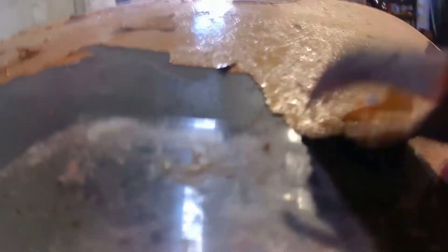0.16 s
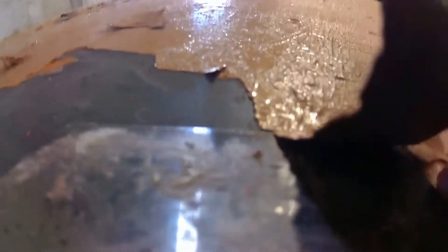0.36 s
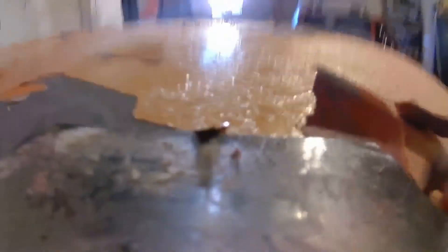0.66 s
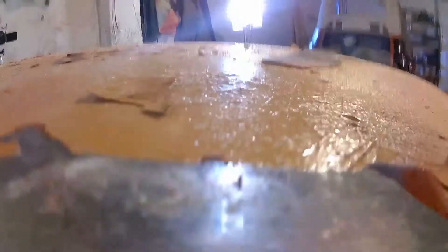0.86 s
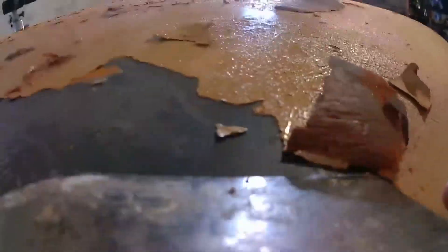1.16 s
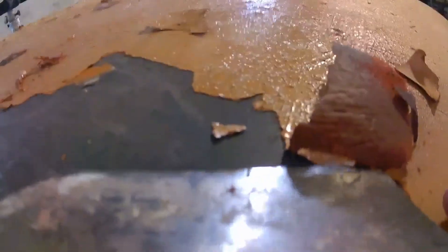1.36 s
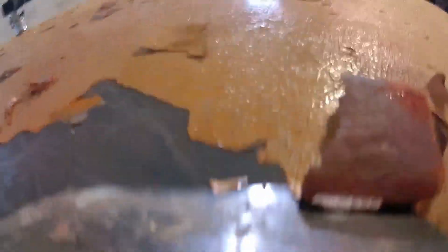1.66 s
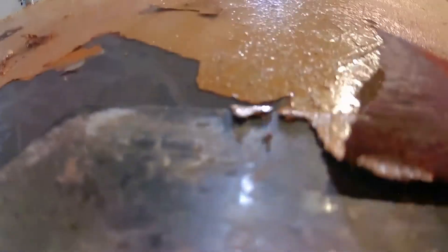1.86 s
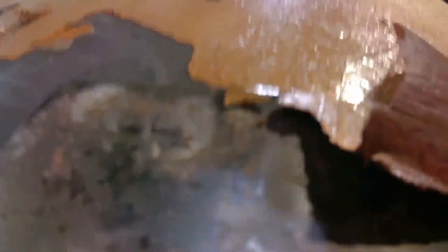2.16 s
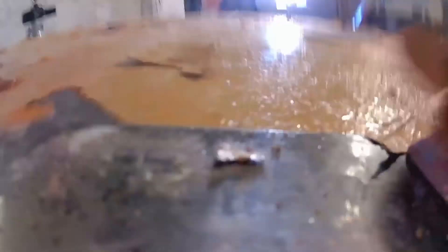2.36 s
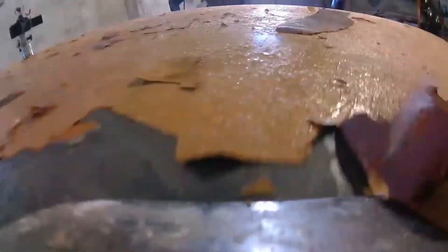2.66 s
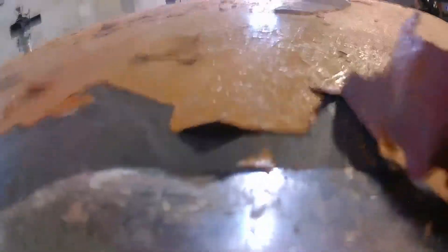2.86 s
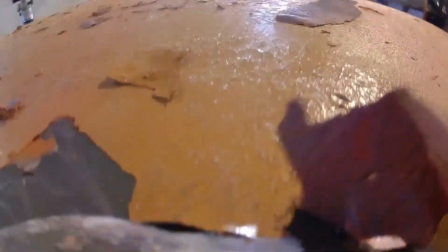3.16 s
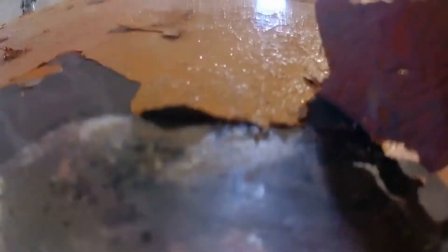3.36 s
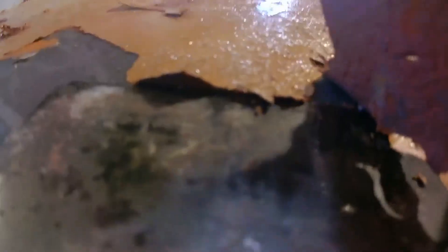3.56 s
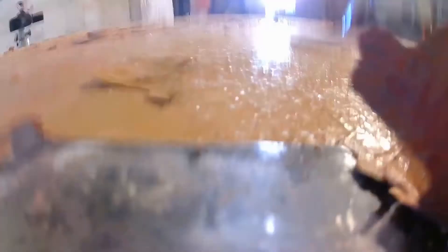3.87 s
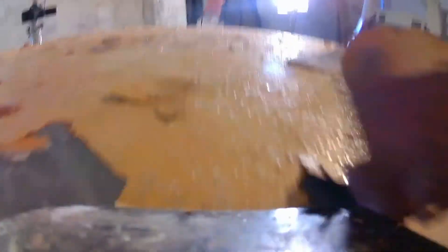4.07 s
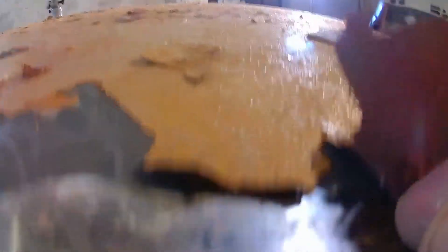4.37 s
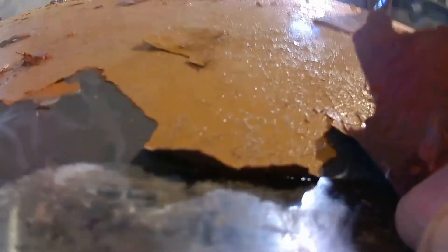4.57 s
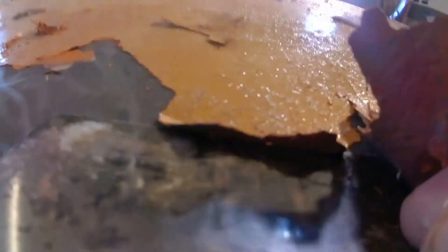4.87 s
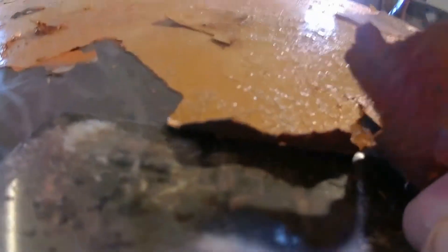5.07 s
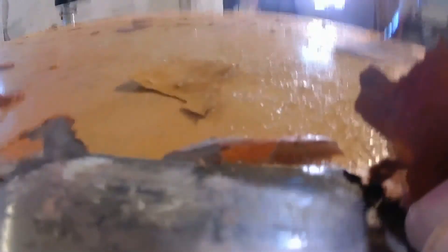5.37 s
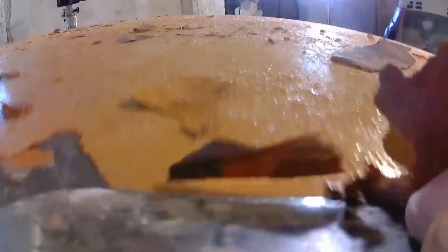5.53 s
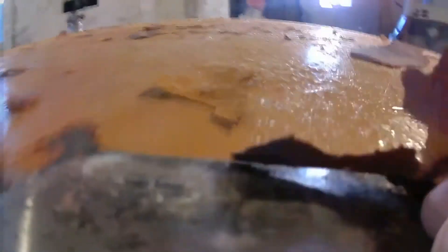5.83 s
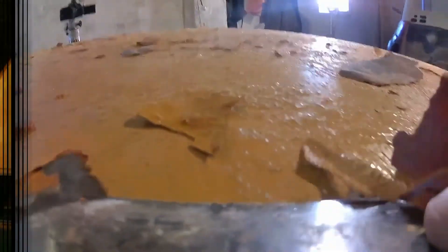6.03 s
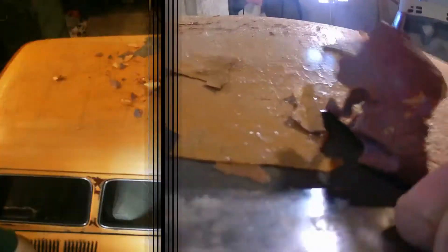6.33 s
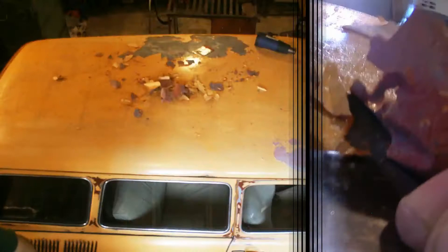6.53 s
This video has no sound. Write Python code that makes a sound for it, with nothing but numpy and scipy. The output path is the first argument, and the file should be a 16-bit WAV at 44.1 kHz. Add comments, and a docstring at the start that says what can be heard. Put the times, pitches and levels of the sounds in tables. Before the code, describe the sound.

Very close, dry scraping of a wide steel blade under flaking paint on a car roof, picked up through the metal without room echo. From the start, short rough shoves rasp and crackle, strong around 0.2 and 0.7 to 1.0 seconds, with a low groan and a skidding squeal. Lighter strokes with snapping chips follow until 2.0. At about 2.35 the edge catches with a hard crack and a deep thump, then more scraping and groaning; a heavy hollow knock lands at 3.14. After a short dip, a strong rasp comes at 3.8, and more strokes until 4.4. From 4.5 to 5.2 it is nearly quiet, with faint rubbing and small ticks. A loud cracking jolt breaks in at 5.35, another at 5.6, then broad rasps around 5.9, a sharp snap at 6.27, and short scrapes and a clack until about 6.7. Peaks distort; a faint dull noise floor lies beneath.

```python
"""Dry, close rasping in short strokes: a wide steel scraper is shoved under the flaking paint of a car roof.
Random tiny fractures of grit and paint ring through filters for the steel; others make the roof panel boom.
Decaying tones thump as the edge catches, bursts of cracks are snapping chips, and gliding tones groan and screech.
The sound reaches a small recorder on the scraper through the metal, with no room echo, and overloads it.
"""
import sys
import numpy as np
from scipy import signal
from scipy.fft import rfft, irfft, next_fast_len
from scipy.io import wavfile
from scipy.ndimage import uniform_filter1d, map_coordinates

SR = 44100
rng = np.random.default_rng(int(sys.argv[2]) if len(sys.argv) > 2 else 0)


def store_wav(level_fs):
    """Save 16-bit WAV to argv[1]."""
    pcm = np.round(np.clip(np.atleast_2d(level_fs), -1, 1) * 32767)
    wavfile.write(sys.argv[1], SR, pcm.T.astype(np.int16))


N = 295463
TIME = np.arange(N) / SR  # seconds

# colour of blade and mount: f/Hz, gain/dB
BLADE_COLOUR = [(300, 0), (800, -0.5), (1150, 2.5), (1440, 9), (1600, -4), (1720, -9), (1920, 0.5),
                (2250, -3), (2700, 0.5), (3050, 0.5), (3350, -6.5), (3700, -1), (4050, 1), (4450, 2.5),
                (4750, -4.5), (5400, -5.5), (6000, -9), (6350, -5), (7000, -30)]
# resonances of the roof panel under the blade: f/Hz, width/Hz, gain/dB
ROOF_MODES = [(77, 59, 1), (143, 100, 5), (190, 45, -17.5), (283, 91, -6), (412, 147, 1), (715, 320, -9.5)]
# shoves of the scraper: t of full force/s, rise/s, hold/s, fall/s, rasp drive/dB,
# then edge noise, fine tearing, blade ring and hollow rattle (each dB over the rasp drive),
# roof boom drive/dB, lower and upper f/Hz at which the edge bears on a node
SHOVES = [(0.061, 0.17, 0.018, 0.034, -41, -2.5, -25, -7, -4.5, -40.5, 2540, 3360),
          (0.155, 0.071, 0.087, 0.11, -29.5, -5.5, -23, -6, -3, -27.5, 2430, 5000),
          (0.431, 0.15, 0.008, 0.19, -45.5, 0, -16, -4, -7, -41, 1720, 4700),
          (0.502, 0.069, 0.033, 0.18, -42.5, -8.5, -17, -6, -4, -37, 1720, 4950),
          (0.665, 0.1, 0.052, 0.069, -27, -2.5, -13.5, -16, -3.5, -26.5, 1046, 3270),
          (0.84, 0.1, 0.051, 0.098, -27, -0.5, -15, -27, -3, -30, 1140, 3130),
          (1.001, 0.061, 0.07, 0.058, -25.5, -1, -7.5, -33, -4.5, -43, 2810, 3080),
          (1.12, 0.11, 0.027, 0.044, -36, -1, -11, -17, 2, -37, 2630, 4570),
          (1.16, 0.012, 0.012, 0.028, -30.5, 2.5, -14, -21, 3.5, -28.5, 2160, 5060),
          (1.241, 0.22, 0.039, 0.048, -35, -1, -16.5, -15, -2, -35.5, 2570, 5040),
          (1.433, 0.078, 0.059, 0.024, -48.5, -1.5, -17, -1, -2.5, -48, 930, 5170),
          (1.496, 0.042, 0.045, 0.082, -32, 0, -13, -4, -5.5, -32.5, 970, 5400),
          (1.687, 0.057, 0.042, 0.046, -57.5, -1, -18, -20, 1, -50, 2630, 3320),
          (1.767, 0.076, 0.029, 0.076, -30.5, -2, -33, -4, -2.5, -28, 2350, 5330),
          (1.956, 0.17, 0.037, 0.091, -40, -3, -20, -5, -5.5, -34.5, 2400, 3380),
          (2.168, 0.009, 0.48, 0.094, -57, 3.5, -4.5, -9, -9, -47.5, 2520, 4650),
          (2.378, 0.064, 0.046, 0.11, -26.5, -6, -15, -27, -3.5, -29, 2490, 4800),
          (2.63, 0.1, 0.074, 0.4, -34.5, 0, -10, -28, 1, -38, 1480, 2900),
          (2.676, 0.0085, 0.0056, 0.01, -31.5, 7, -20, -24, -6, -33, 1850, 2890),
          (2.771, 0.13, 0.018, 0.072, -34, 0.5, -5, -18, -8, -26.5, 2820, 4750),
          (2.891, 0.12, 0.067, 0.11, -35, -4.5, -14, -5, -5, -34, 1740, 5060),
          (2.957, 0.057, 0.059, 0.045, -28.5, 1.5, -14, -11, 0.5, -24, 1690, 5030),
          (3.134, 0.054, 0.06, 0.051, -38.5, -7.5, -11.5, -13, -2.5, -31, 2220, 2950),
          (3.353, 0.027, 0.0024, 0.12, -38.5, -7, -4.5, -8, 0, -33.5, 1840, 5190),
          (3.563, 0.063, 0.003, 0.045, -52.5, 1, -13, -1, -4, -50, 2370, 4430),
          (3.708, 0.081, 0.036, 0.06, -50.5, 2.5, -18, -3, -5, -44, 2240, 4740),
          (3.834, 0.062, 0.071, 0.043, -24.5, -2.5, -11.5, -19, -5.5, -25, 1245, 3640),
          (3.98, 0.13, 0.01, 0.1, -41, 4.5, -5, 1.5, -1, -60, 1730, 3320),
          (4.089, 0.086, 0.0062, 0.042, -30, 2, -7, -16, -1, -40, 1680, 3940),
          (4.122, 0.033, 0.029, 0.091, -30.5, -3.5, -13, -29, -4.5, -46, 1270, 4500),
          (4.233, 0.11, 0.0045, 0.036, -34.5, -0.5, -11, -24.5, 0.5, -32.5, 1950, 3050),
          (4.394, 0.14, 0.021, 0.047, -28.5, -0.5, -14.5, -20, -2, -32, 1200, 5200),
          (4.749, 0.2, 0.013, 0.19, -54.5, 4.5, -10.5, -1, -4, -51.5, 2540, 3400),
          (4.939, 0.13, 0.013, 0.05, -54.5, -3, -15, -21, -0.5, -51, 1660, 2870),
          (5.012, 0.077, 0.024, 0.35, -59.5, 1.5, -12, -19, -0.5, -64, 1750, 4800),
          (5.267, 0.052, 0.003, 0.15, -47, -4.5, -36, -10, -1.5, -33.5, 2240, 5050),
          (5.353, 0.022, 0.057, 0.064, -22, -4, -13.5, -12, -4, -24.5, 2260, 4870),
          (5.625, 0.12, 0.082, 0.095, -32, -5.5, -11, -15, -6, -36, 860, 4260),
          (5.847, 0.12, 0.043, 0.072, -26.5, 1.5, -18, -14, -3, -29, 1590, 3070),
          (5.905, 0.036, 0.066, 0.1, -27, -6, -18, -29, -5, -29.5, 2580, 5230),
          (6.073, 0.037, 0.1, 0.22, -35.5, -2.5, -11.5, -29, -2, -42, 2550, 3100),
          (6.26, 0.004, 0.076, 0.19, -31, -7.5, -10, -3.5, -5, -41, 2050, 3140),
          (6.421, 0.048, 0.05, 0.025, -29, 1, -14, -20, -0.5, -26, 2270, 3240),
          (6.597, 0.015, 0.0048, 0.025, -41, -11, -22, 10, 4, -30, 1010, 4890),
          (6.699, 0.007, 0.01, 0.03, -28, 8.5, -3, -11, 2, -31, 1140, 5400)]
# paint chips snap and the steel edge clacks down: t/s, drive/dB, roof knock over the crack drive/dB
CHIPS = [(0.118, -18.5, -26), (0.276, -17.5, -21), (0.5064, -46, -10), (0.542, -23.5, -23),
         (0.611, -28, -15), (1.159, -12, 7), (1.526, -6.5, -13), (1.548, -11.5, -18), (1.7615, -15, -9),
         (1.919, -26.5, 1), (1.978, -15.5, -7), (2.176, -30, -36), (2.345, -17, 6), (2.355, 4.5, 2.5),
         (2.483, -16.5, -11), (2.75, -11.5, -13), (2.772, 4.5, -27), (2.8843, -31, -14), (3.134, -20, -30),
         (3.143, -9, 16.5), (3.17, -27, 10), (3.338, -17.5, -26), (3.36, -23, 13), (3.6991, -21.5, -15),
         (3.7383, -8, -32), (3.7895, -11.5, -30), (3.809, -15, -21), (3.978, -22.5, -23), (3.987, -22, -14),
         (3.9988, -11.5, -32), (4.2263, -23.5, 15), (4.3153, -13, -10), (4.77, -48, -20),
         (4.933, -34.5, -11), (5.241, -31, -24), (5.26, -24, -19), (5.3508, 10, -4.5), (5.563, -20, -28),
         (5.577, -33, -17), (5.602, -0.5, 0.5), (5.664, -26, 2), (5.693, -24, 10), (5.809, -22.5, 8.5),
         (6.0812, -13, 2), (6.099, -10, -17), (6.188, -17, -1), (6.2503, -7.5, -27), (6.2653, 11, -15),
         (6.2807, -1.5, -13), (6.5922, -13.5, -1), (6.6975, 2, 2)]


def from_db(db):
    """Turn decibels into a gain."""
    return 10 ** (np.asarray(db) / 20)


def rms_one(x):
    """Scale to an rms level of one."""
    return x / np.sqrt(np.mean(x ** 2) + 1e-20)


def band(x, edges_hz, kind="band", order=3):
    """Keep one range of frequencies with a Butterworth filter."""
    sections = signal.butter(order, edges_hz, kind, fs=SR, output="sos")
    return signal.sosfilt(sections, x + 1e-18)


def drift(rate_hz):
    """Smooth random wandering with a spread of one: noise without its fast part."""
    noise = rng.standard_normal(N + SR)
    # the first second is dropped so that the filter has settled
    return rms_one(band(noise, rate_hz, "low", order=2)[SR:])


def two_poles(hz, r):
    """Feedback of a resonance: the nearer r is to one, the longer it rings."""
    return [1, -2 * r * np.cos(2 * np.pi * hz / SR), r * r]


def resonate(x, modes):
    """Let a sound excite several resonances side by side, each with its own gain."""
    out = np.zeros(N)
    for hz, width_hz, db in modes:
        r = np.exp(-np.pi * width_hz / SR)
        ring = signal.lfilter([1, 0, -1], two_poles(hz, r), x + 1e-18)
        out += from_db(db) * (1 - r * r) / 2 * ring
    return out


def steady(x, window_s):
    """Even out the slow level and keep the fast grain."""
    power = uniform_filter1d(x * x, int(window_s * SR))
    return x / np.sqrt(power + 1e-12)


def register(x, edges_hz, window_s):
    """One range of a sound at a steady level, filtered both ways so that it is not delayed."""
    sections = signal.butter(3, edges_hz, "band", fs=SR, output="sos")
    return steady(signal.sosfiltfilt(sections, x), window_s)


def coloured(x, spectrum):
    """Give a sound a colour listed as f/Hz, gain/dB, joined smoothly over pitch."""
    hz, db = np.transpose(spectrum)
    size = next_fast_len(N + SR // 10)
    log_hz = np.log(np.fft.rfftfreq(size, 1 / SR) + 1)
    gain = from_db(np.interp(log_hz, np.log(hz), db))
    return irfft(rfft(x, size) * gain, size)[:N]


def burst(s, db, t60):
    """An envelope that leaps up at s and dies away by 60 dB in t60 seconds: (slice, gain)."""
    at = int(s * SR)
    t = TIME[:min(SR // 5, N - at)]
    return slice(at, at + len(t)), from_db(db - 60 * t / max(t60, 0.003))


def swell(start, end):
    """A rounded arch from start to end."""
    arch = 4 * (TIME - start) * (end - TIME) / (end - start) ** 2
    return np.sqrt(np.clip(arch, 0, 1))


def grit(per_s, spread_db):
    """Tiny fractures are single clicks at random moments, a few much larger than the rest."""
    sizes = from_db(spread_db * np.minimum(rng.exponential(1, N), 5)) * rng.choice([-1, 1], N)
    return rms_one(sizes * (rng.random(N) < per_s / SR))


def background():
    """A faint, dull noise floor."""
    # colour of the noise floor: f/Hz, relative level/dB per Hz
    floor_colour = [(18, -33), (30, 6), (96, 29), (1060, -36), (1270, -8), (1360, 10), (2730, -57),
                    (3340, -31), (4090, 4.5), (6400, -46), (8320, -61), (14100, -120)]
    noise = coloured(rng.standard_normal(N), floor_colour)
    return from_db(-54.5) * rms_one(band(noise, 35, "high"))


def force(s, rise, hold, fall):
    """A shove builds, holds and lets go: (slice, gain)."""
    swing_db = 21.5  # gained over the rise time and lost over the fall time
    curve = 0.88     # below 1: the level changes fastest near full force
    span = slice(max(int((s - 3 * abs(rise)) * SR), 0), int((s + hold + 3 * abs(fall)) * SR))
    t = TIME[span]
    before = np.maximum(s - t, 0) / max(rise, 0.005)
    after = np.maximum(t - s - hold, 0) / max(fall, 0.005)
    return span, from_db(-swing_db * (before + after) ** curve)


def shoves():
    """The shoves add up in power to the gains of rasp, edge noise, tearing, ring, rattle and boom."""
    rest_db = [-65.5, -66, -83, -83, -68, -65.5]  # the same six between shoves
    power = np.outer(from_db(rest_db) ** 2, np.ones(N))
    for s, rise, hold, fall, rasp_db, *colour_db, boom_db, _, _ in SHOVES:
        span, gain = force(s, rise, hold, fall)
        peak_db = [rasp_db, *np.add(rasp_db, colour_db), boom_db]
        power[:, span] += np.outer(from_db(peak_db), gain) ** 2
    return np.sqrt(power)


def ringing(x, travel, turns=11.0, count=40):
    """The steel rings in many close modes; each waxes and wanes as the edge travels over its nodes."""
    # sharp, lightly damped modes of the steel: f/Hz, width/Hz, gain/dB
    sharp_modes = [(1465, 50, 0), (2133, 24, 9), (2574, 28, 10), (2911, 24, 9), (3359, 16, 16),
                   (3798, 24, 12), (5048, 14, 16), (5764, 26, 11), (6172, 30, 11)]
    chance = rng.random((count + len(sharp_modes), 3))
    # a crowd of thin-sheet modes, spread at random between two limits in Hz
    places = np.interp(np.arange(count) + chance[:count, 0], [0, count], [1495.6, 6430])
    sheet_width_hz, sheet_db = 11.2, 14.5
    modes = [(hz, sheet_width_hz, sheet_db) for hz in places] + list(sharp_modes)
    out = np.zeros(N)
    for mode, (_, phase, pace) in zip(modes, chance):
        cycles = phase + (0.5 + pace) * turns * travel
        coupling = np.sin((2 * np.pi * cycles).astype(np.float32))
        out += resonate(x * coupling, [mode])
    return out


def bent(x):
    """The changing load bends the blade, so all its modes glide together."""
    bend, rate_hz = 0.003, 1.2  # rough share of detuning; fastest wandering
    shift = bend * SR / (2 * np.pi * rate_hz) * drift(rate_hz)
    # reading the sound a little early or late raises or lowers its pitch
    return map_coordinates(x, [np.arange(N) + shift], order=3, mode="mirror")


def nodes(x, rasp_gain):
    """Modes with a node under the edge are weakened: each shove leaves two hollows in the sound."""
    width_hz, depth = 175, 0.77  # depth: largest share subtracted
    out = x.copy()
    for s, rise, hold, fall, rasp_db, *_, lower_hz, upper_hz in SHOVES:
        span, gain = force(s, rise, hold, fall)
        share = (from_db(rasp_db) * gain / rasp_gain[span]) ** 2  # this shove's part of the power
        for hz in (lower_hz, upper_hz):
            edges_hz = [hz - width_hz / 2, hz + width_hz / 2]
            dead = signal.butter(2, edges_hz, "band", fs=SR, output="sos")
            out[span] -= depth * share * signal.sosfiltfilt(dead, x[span])
    return out


def tears():
    """Paint of uneven thickness tears with quick surges."""
    return from_db(0.88 * drift(rate_hz=30))


def flaking():
    """Small flakes break off at random under the edge; each lifts the scrape's level for an instant."""
    per_s, smallest_db, spread_db, t60_s = 95, -22, 3.5, 0.01  # dB relative to the scrape
    sizes = from_db(smallest_db + spread_db * np.minimum(rng.exponential(1, N), 2))
    breaks = sizes * (rng.random(N) < per_s / SR)
    fade_per_sample = from_db(-60 / (t60_s * SR))
    return signal.lfilter([1], [1, -fade_per_sample], breaks + 1e-18)


def scraping(judder, rasp_gain, edge_gain, tearing_gain, ring_gain):
    """Crumbling paint rasps through the blade; a harder push moves it faster and broadens the sound."""
    # main resonance of the blade: f/Hz, width/Hz, gain/dB
    main_mode = [(1434, 76, 0)]
    travel = np.cumsum(rasp_gain ** 0.61)
    crumbs = grit(per_s=4000, spread_db=4.0) * from_db(2.0 * judder)
    # pressing hard damps the blade's own ring and lets the raw, broad crackle through
    press = np.minimum(rasp_gain / from_db(-27), 1) ** 0.98  # 1 is a full push
    ring_left = 1 - 0.39 * press
    waves = from_db(-3) * crumbs + ring_left * bent(ringing(crumbs, travel / travel[-1]))
    raw = press * band(crumbs, 3420, "low", order=1)
    steel = nodes(coloured(waves, BLADE_COLOUR) + raw, rasp_gain)
    rasp = register(steel, [880, 2280], window_s=0.033)
    edge = register(steel, [2280, 4650], window_s=0.015)
    tearing = register(steel, [4650, 6700], window_s=0.03)
    ring = steady(resonate(waves, main_mode), window_s=0.071)
    # a lightly held blade rubs unevenly
    hand = from_db(2.43 * (1 - press) * drift(rate_hz=14))
    drag = rasp_gain * rasp * tears()
    drag += (edge_gain * edge + tearing_gain * tearing) * tears()
    drag += ring_gain * ring
    return hand * drag * (1 + flaking()) + screeches(waves)


def booming(judder, rattle_gain, boom_gain):
    """The uneven drag of the edge shakes the roof panel, which flexes deeply where it is least stiff."""
    panel = resonate(grit(per_s=1500, spread_db=2.5) * from_db(1.94 * judder), ROOF_MODES)
    flex = steady(band(panel, [42, 100]), window_s=0.19)
    boom = steady(band(panel, [100, 280]), window_s=0.095)
    rattle = steady(band(panel, [280, 900]), window_s=0.24)
    # the deep flexing trails the boom by 16 ms and never quite stops
    late_gain = np.interp(TIME - 0.016, TIME, boom_gain)
    flex_gain = np.hypot(from_db(-5) * late_gain, from_db(-52))
    return from_db(2.3) * boom_gain * boom + flex_gain * flex + rattle_gain * rattle


def snaps(crack_db=-13.5, knock_db=-9, soft_hz=4700):
    """A chip splits with one sharp crack, then crumbles; the cracks ring the blade and knock on the roof."""
    crumble_t60_s, split_t60_s, split_db = 0.04, 0.0085, -7.5
    on_blade, on_roof = np.zeros((2, N))
    for s, db, roof_db in CHIPS:
        span, crumble = burst(s, db, crumble_t60_s)
        _, split = burst(s, db + split_db, split_t60_s)
        on_blade[span] += crumble + split
        on_roof[span] += crumble * from_db(roof_db)
    cracks = rng.choice([-1., 1.], N)
    soft_cracks = band(coloured(cracks, BLADE_COLOUR), soft_hz, "low", order=8)
    blade = on_blade * steady(soft_cracks, window_s=0.0027)
    # only the roof's higher modes take part
    roof = on_roof * steady(resonate(cracks, ROOF_MODES[2:]), window_s=0.008)
    return from_db(crack_db) * blade + from_db(knock_db) * band(roof, 940, "low", order=2)


def knocks():
    """The edge clacks down and the roof answers with a hollow ring of fading tones."""
    # ring of a knock on the roof: f/Hz, level over the knock drive/dB, time to fade by 60 dB/s
    hollow_tones = [(262, -22.5, .06), (367, -22, 0.07), (594, -27, 0.042), (790, -34, 0.023)]
    out = np.zeros(N)
    for s, db, roof_db in CHIPS:
        for hz, mode_db, t60 in hollow_tones:
            span, fade = burst(s, db + roof_db + mode_db, t60)
            out[span] += fade * np.sin(2 * np.pi * hz * TIME[:len(fade)])
    return out


def groans(judder, waver=0.03):
    """The edge sticks and slips in rhythm: regular slips make a short, wavering tone."""
    # groans of the roof: start t/s, end t/s, first f/Hz, last f/Hz, level/dB
    slips = [(0.164, 0.262, 190, 176, -25), (0.273, 0.284, 170, 157, -20), (0.623, 0.685, 149.7, 121, -22),
             (0.796, 0.881, 117.7, 128, -20.5), (1.731, 1.78, 135, 157, -23), (1.98, 2.025, 110, 110, -31),
             (2.372, 2.43, 85.6, 78, -13.5), (2.425, 2.489, 125, 112, -28.5),
             (3.007, 3.05, 115.3, 64.5, -14.5), (1.756, 1.811, 445, 390, -21.5),
             (1.773, 1.842, 84.8, 95, -21.5), (2.635, 2.65, 395, 350, -30), (2.662, 2.74, 308, 269, -25.5),
             (2.755, 2.825, 268, 254, -25.5), (2.872, 2.962, 141.3, 216, -26),
             (3.404, 3.413, 370, 320, -29), (5.298, 5.37, 85, 109, -19), (5.65, 5.667, 438, 470, -25.5),
             (5.67, 5.752, 235, 206, -31.5)]
    out = np.zeros(N)
    wobble = 1 + waver * judder
    for start, end, first_hz, last_hz, db in slips:
        pitch_hz = np.interp(TIME, [start, end], [first_hz, last_hz]) * wobble
        cycles = np.cumsum(pitch_hz) / SR
        out += from_db(db) * swell(start, end) * np.sin(2 * np.pi * cycles)
    return out


def jolts(sag=0.37, settle_s=0.015, overtone=1.822, overtone_db=-6, overtone_t60=0.049):
    """Each catch sets the panel swinging with one quick overtone; the pitch sinks as the dent relaxes."""
    # the edge catches and jolts the roof: t/s, level/dB, middle f/Hz of the sinking pitch
    catches = [(0.637, -12, 150), (0.807, -22, 133), (1.159, -20, 206), (1.167, -24, 74.4),
               (1.493, -13.5, 146), (1.765, -27, 123), (2.353, 0, 127.4), (2.382, -10, 83.6),
               (2.758, -27, 198), (2.777, -29, 183), (2.998, -9, 81), (3.142, 5.5, 212.5),
               (3.169, -15, 205), (3.185, -33, 144), (3.361, -3.5, 205), (3.423, -28, 105),
               (3.743, -12, 126), (3.827, -3, 114), (4.417, -10.5, 116), (4.633, -36, 86),
               (4.847, -34, 81.4), (5.018, -35, 77.6), (5.149, -33.5, 87), (5.258, -28, 103),
               (5.346, 1, 112.3), (5.413, -10, 96.2), (5.606, -9, 212), (5.693, -26, 253),
               (6.004, -25.5, 80), (6.187, -17, 196), (6.269, -3, 152.3), (6.45, -5, 125),
               (6.463, -20.5, 76.6), (6.605, -25, 90)]
    low_t60_s, low_hz, damping_slope = 0.17, 83.5, 1.5  # jolts above low_hz die sooner
    attack_s = 0.0018
    out = np.zeros(N)
    for s, db, hz in catches:
        span, fade = burst(s, db, low_t60_s * min(low_hz / hz, 1) ** damping_slope)
        t = TIME[:len(fade)]
        # from a share sag above the middle pitch to the same share below
        pitch_hz = hz * (1 + sag * (2 * np.exp(-t / settle_s) - 1))
        phase = 2 * np.pi * np.cumsum(pitch_hz) / SR
        overtone_fade = from_db(db + overtone_db - 60 * t / overtone_t60)
        swing = fade * np.sin(phase) + overtone_fade * np.sin(overtone * phase)
        out[span] += swing * np.minimum(t / attack_s, 1)
    return out


def screeches(drive, size=64):
    """The edge skids and screeches: the scraping drives one gliding resonance."""
    # screeches: start t/s, end t/s, first f/Hz, last f/Hz, width/Hz, level/dB
    skids = [(0.67, 0.723, 1900, 2250, 600, -34.5), (0.834, 0.883, 736, 1030, 440, -31),
             (0.967, 1.1, 2530, 2470, 500, -27.5), (1.772, 1.821, 1420, 1450, 160, -43),
             (2.346, 2.406, 450, 1580, 490, -34), (2.394, 2.448, 1230, 2300, 450, -40),
             (2.872, 3.013, 1440, 1450, 246, -40), (4.09, 4.177, 2100, 3160, 1000, -29),
             (5.368, 5.4, 1430, 1450, 250, -27), (5.59, 5.733, 2640, 2470, 497, -37.5),
             (5.825, 5.937, 1720, 1400, 450, -31.5), (6.057, 6.2, 2530, 2540, 300, -31.5),
             (6.246, 6.332, 2710, 2490, 330, -28.5), (6.262, 6.296, 1380, 1350, 140, -26),
             (6.38, 6.461, 2350, 2700, 600, -29)]
    out = np.zeros(N)
    for start, end, first_hz, last_hz, width_hz, db in skids:
        r = np.exp(-np.pi * width_hz / SR)
        state, tone = np.zeros(2), np.zeros(N)
        first, last = int(start * SR), int(end * SR)
        # retune every few samples; the state carries the ring across
        for i in range(first, last, size):
            poles = two_poles(np.interp(i, [first, last], [first_hz, last_hz]), r)
            piece = drive[i:i + size]
            tone[i:i + size], state = signal.lfilter([1, 0, -1], poles, piece, zi=state)
        skid = slice(first, last)
        out[skid] += from_db(db) * swell(start, end)[skid] * rms_one(tone[skid])
    return out


def lifting():
    """The edge lifts off the paint for a moment and the blade's sound dips."""
    # lifts of the edge: middle t/s, length/s, depth/dB
    dips = [(1.746, 0.0077, -14), (2.168, 0.015, -14), (3.113, 0.026, -15), (3.319, 0.15, -14),
            (5.586, 0.0095, -4), (5.487, 0.025, -12), (6.237, 0.018, -13.5), (6.551, 0.014, -34),
            (6.634, 0.036, -19)]
    return from_db(sum(db * np.exp(-(2 * (TIME - s) / length) ** 2) for s, length, db in dips))


def scene():
    """One stick-slip judder drives blade and roof; all the layers are then added up."""
    judder = drift(rate_hz=58.0)
    *blade_gains, rattle_gain, boom_gain = shoves()
    blade = lifting() * scraping(judder, *blade_gains)
    roof = booming(judder, rattle_gain, boom_gain)
    drag = blade + roof
    # loud scraping is boosted further, by up to 4.6 dB, so it drives the recorder harder into overload
    loudness = np.minimum(uniform_filter1d(drag ** 2, SR // 30) / from_db(-18.0) ** 2, 1)
    boosted = drag * from_db(4.6 * loudness)
    mono = background() + boosted + snaps() + knocks() + groans(judder) + jolts()
    return np.stack([mono, mono])


def record(dry, top=0.16, hardness=5.7, leak_db=-10):
    """The input overloads; slow samples joined by straight lines mirror a narrow band into the treble."""
    rate_hz, top_hz, cutoff_hz = 16000, 6340, 15650
    clipped = dry / (1 + np.abs(dry / top) ** hardness) ** (1 / hardness)
    narrow_filter = signal.ellip(8, 0.1, 60, top_hz, fs=SR, output="sos")
    passed = signal.sosfiltfilt(narrow_filter, clipped)
    # some of what lies above the narrow band leaks through
    leak = from_db(leak_db) * band(clipped - passed, rate_hz / 2, "low")
    narrow = band(passed + leak, 3.1, "high", order=1)
    ticks = np.arange(0, N, SR / rate_hz)
    samples = [map_coordinates(channel, [ticks], order=3) for channel in narrow]
    joined = np.array([np.interp(np.arange(N), ticks, values) for values in samples])
    # the treble flickers faintly between left and right, more so the higher it lies
    treble = band(joined[0], 5620, "high", order=10)
    loose = from_db(-65.5) * joined[0] + from_db(-10.0) * treble
    loose += from_db(-20.0) * band(treble, 9160, "high")
    out = joined + loose * drift(rate_hz=450) * [[1], [-1]]
    return signal.sosfilt(signal.ellip(10, 0.1, 80, cutoff_hz, fs=SR, output="sos"), out)


dry = scene()
out = record(dry)
store_wav(out)
```